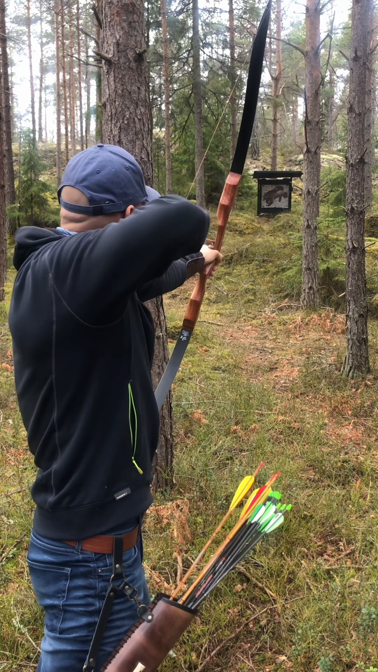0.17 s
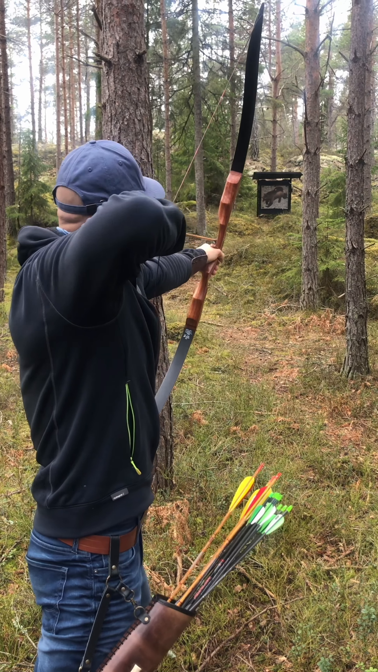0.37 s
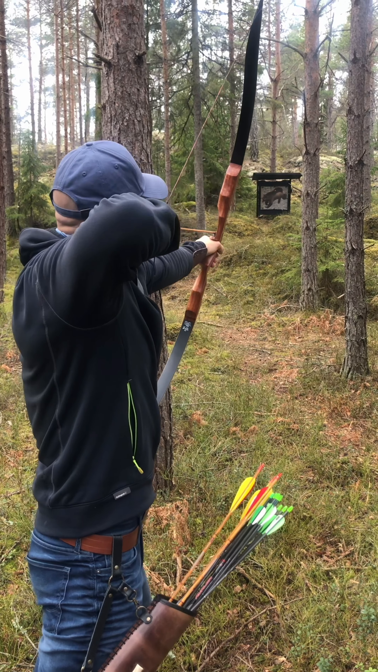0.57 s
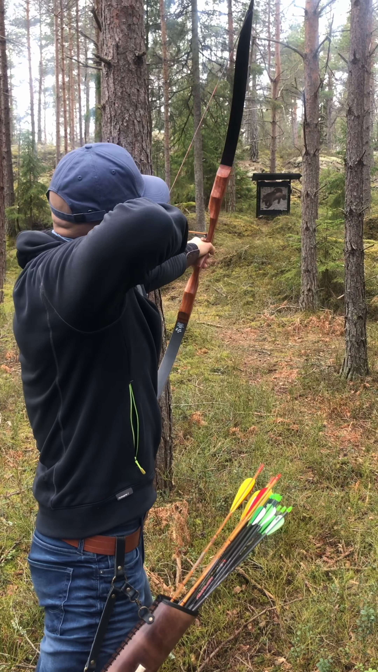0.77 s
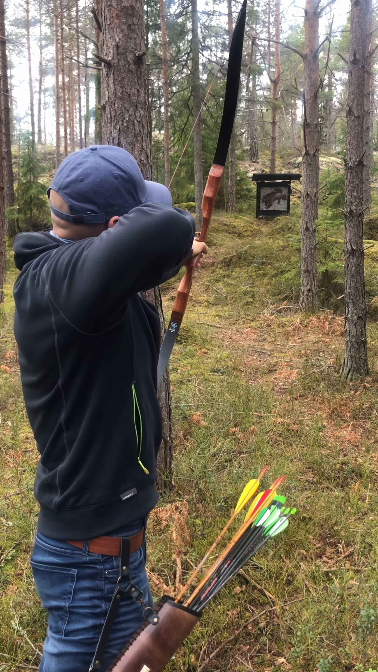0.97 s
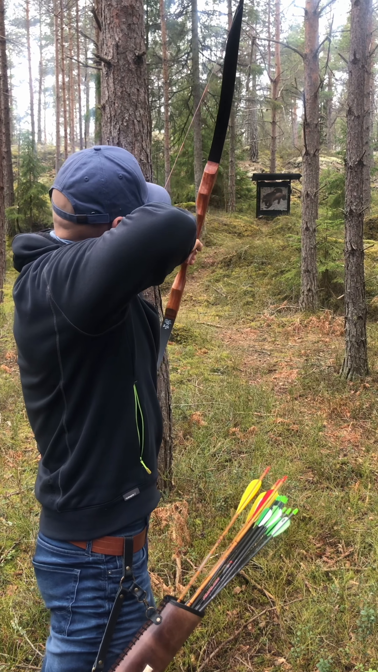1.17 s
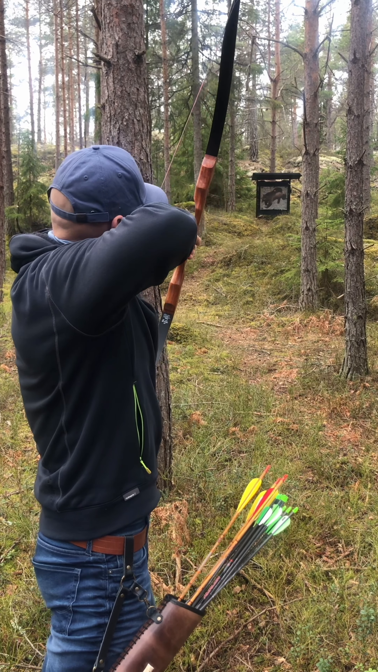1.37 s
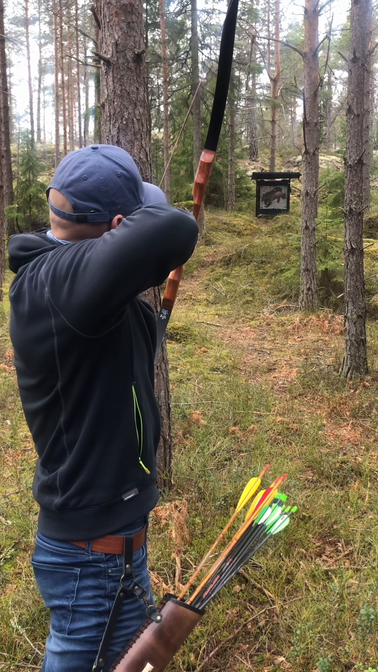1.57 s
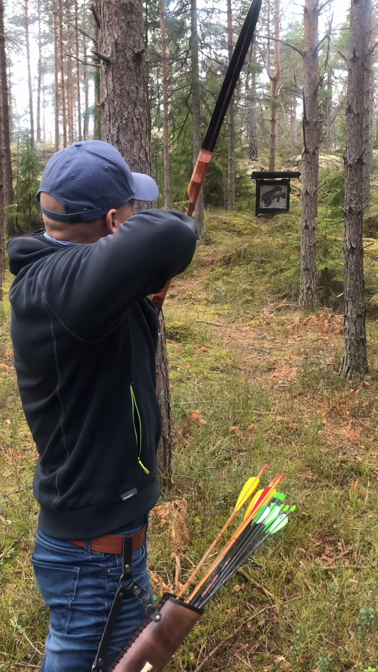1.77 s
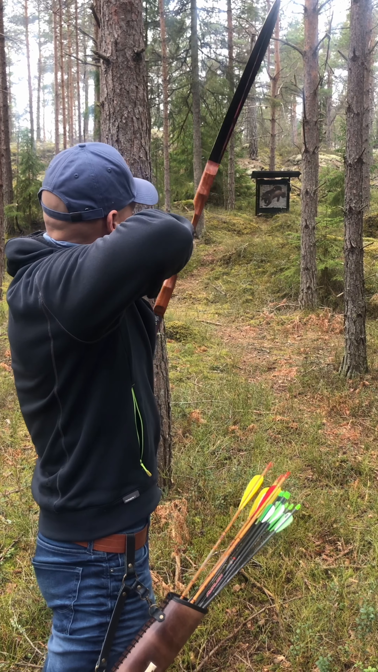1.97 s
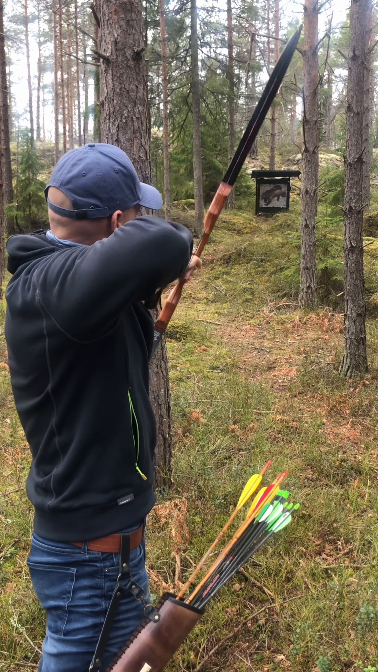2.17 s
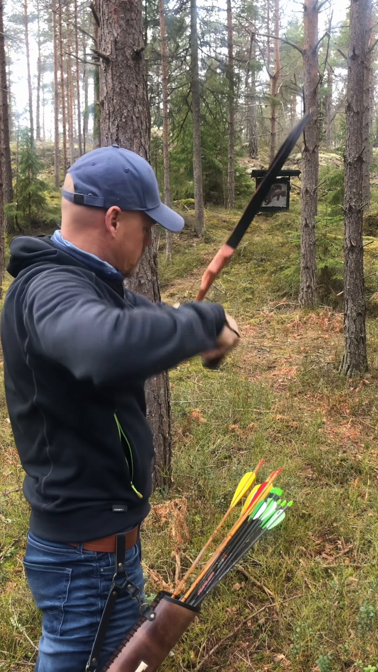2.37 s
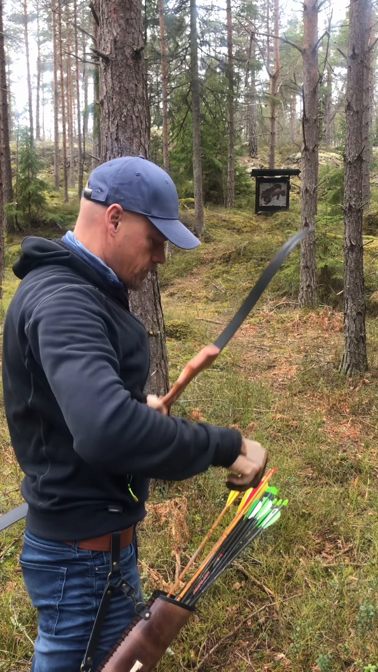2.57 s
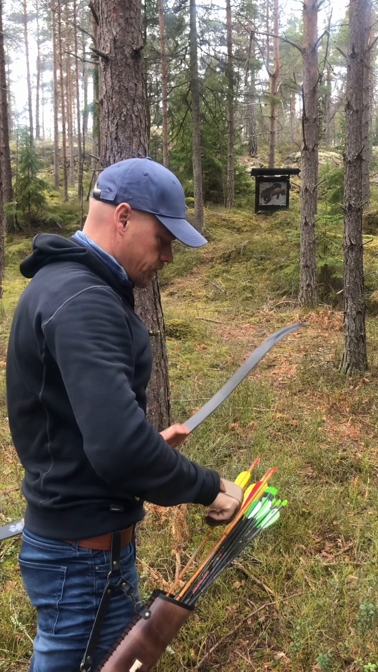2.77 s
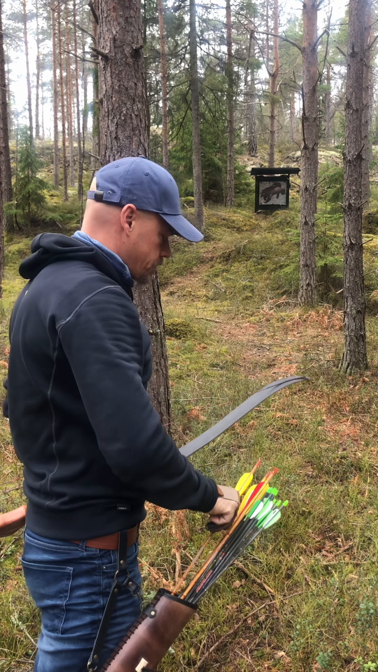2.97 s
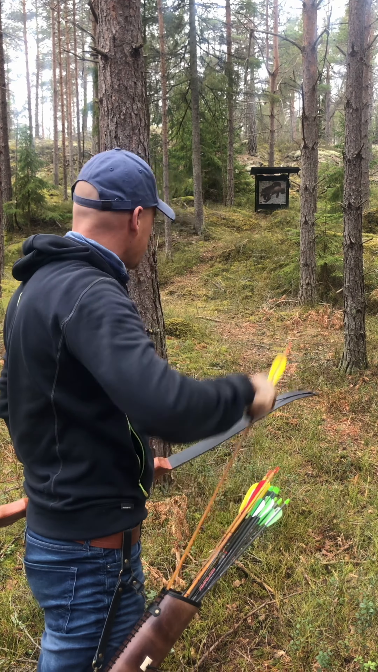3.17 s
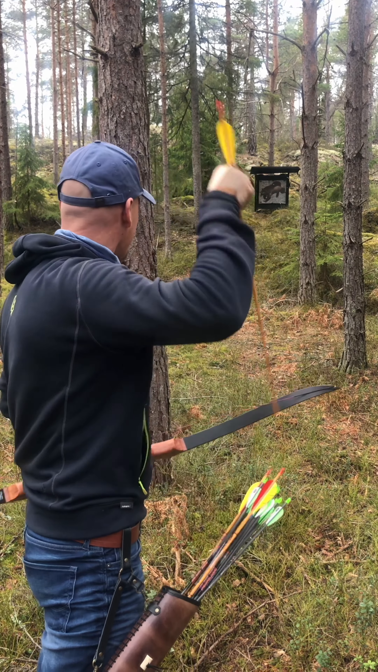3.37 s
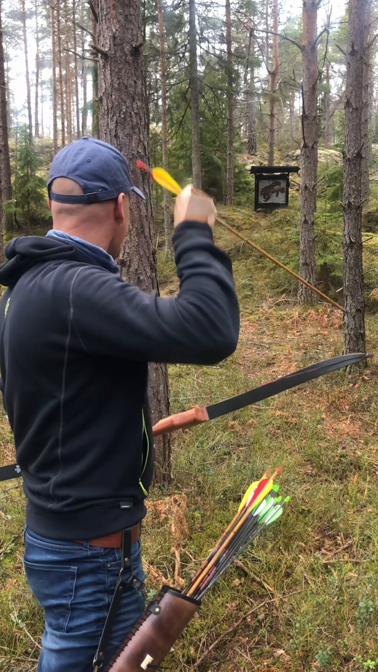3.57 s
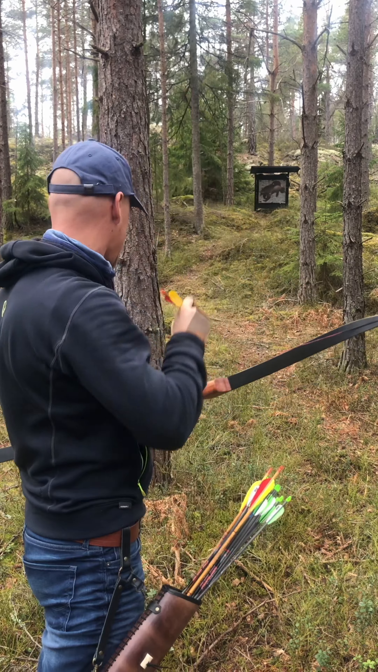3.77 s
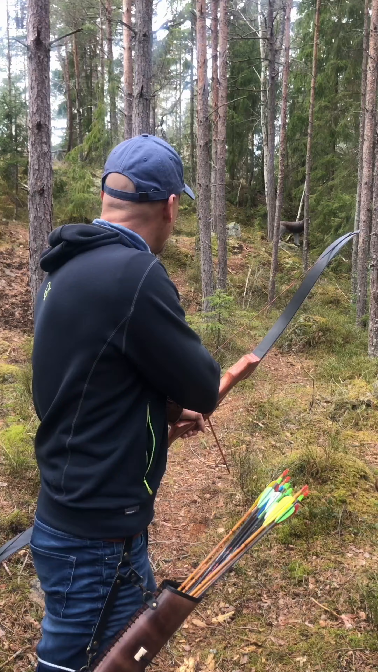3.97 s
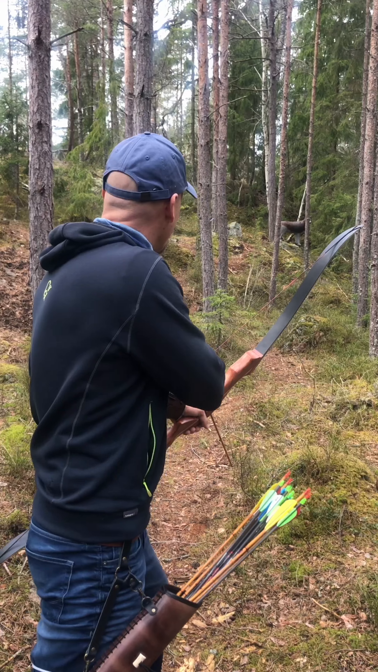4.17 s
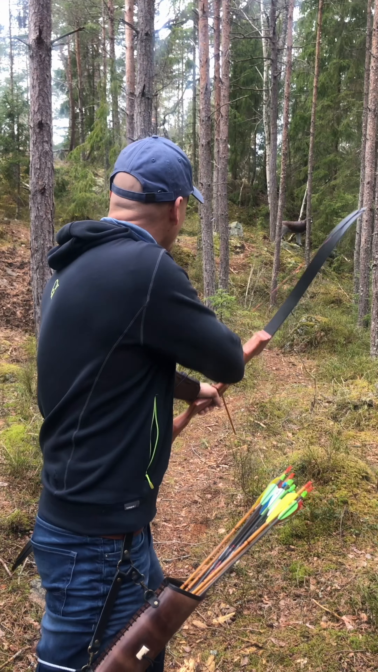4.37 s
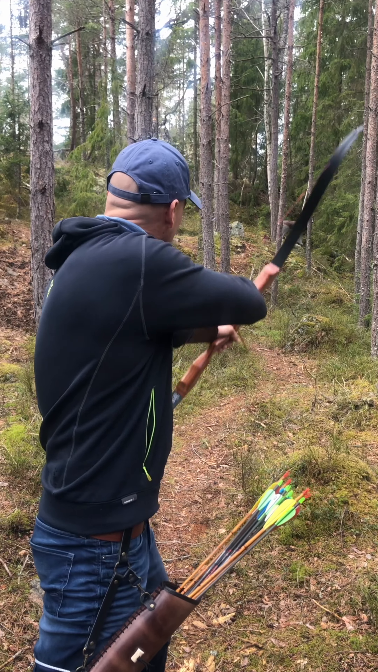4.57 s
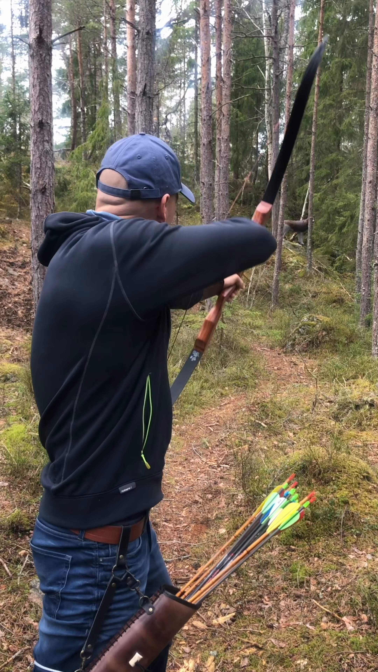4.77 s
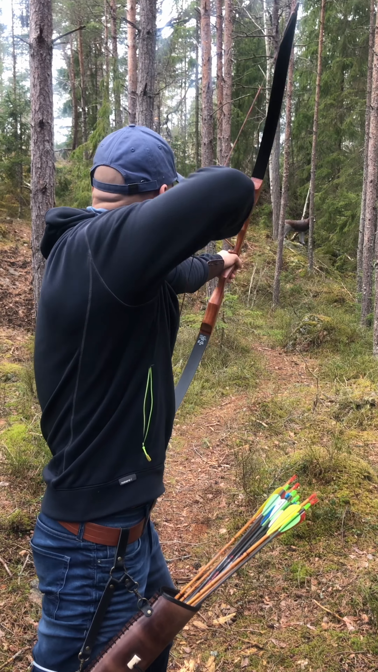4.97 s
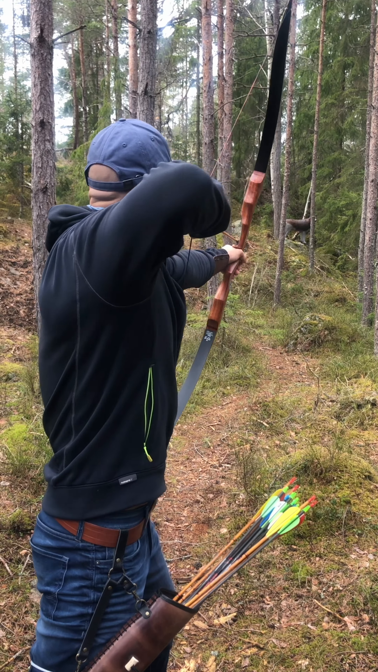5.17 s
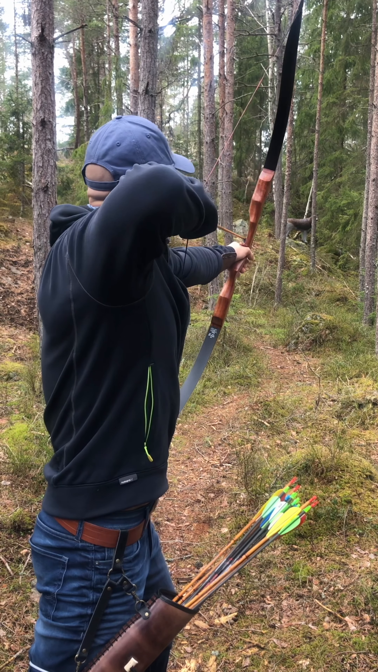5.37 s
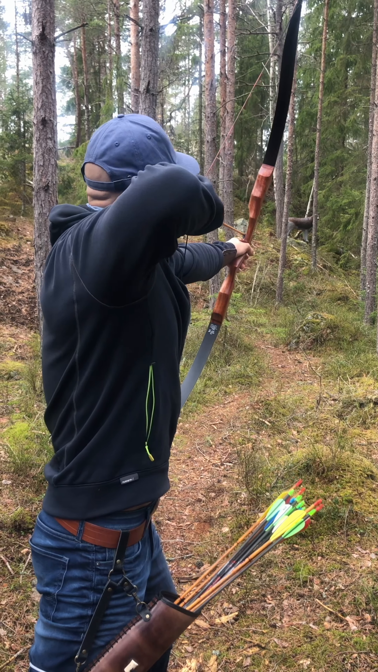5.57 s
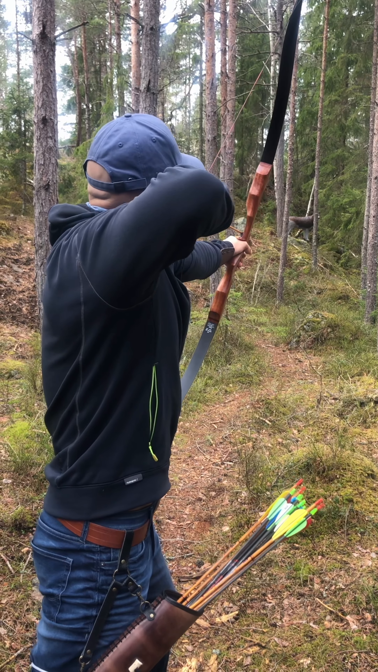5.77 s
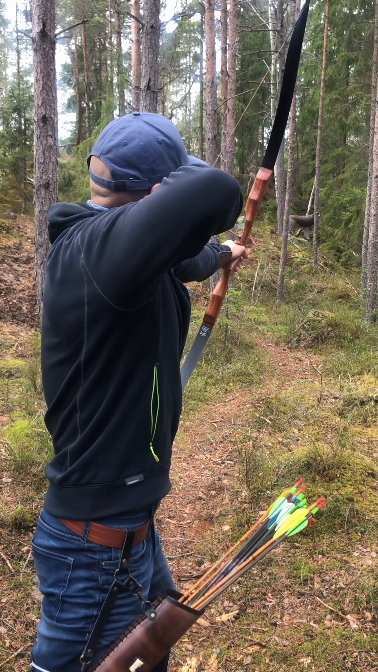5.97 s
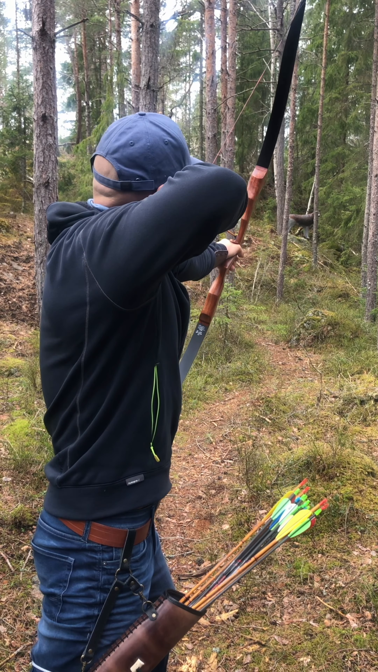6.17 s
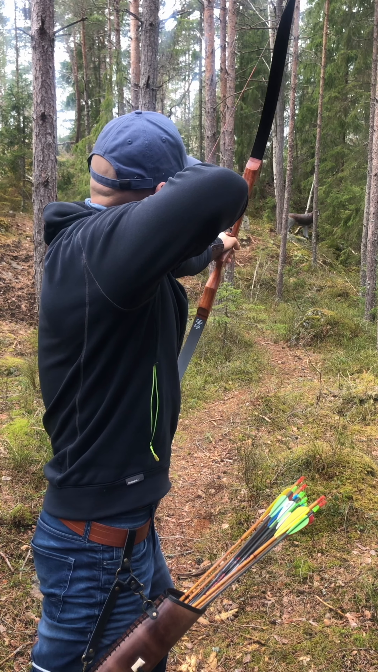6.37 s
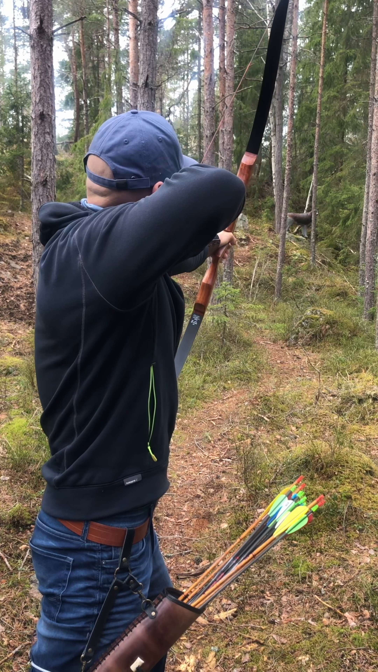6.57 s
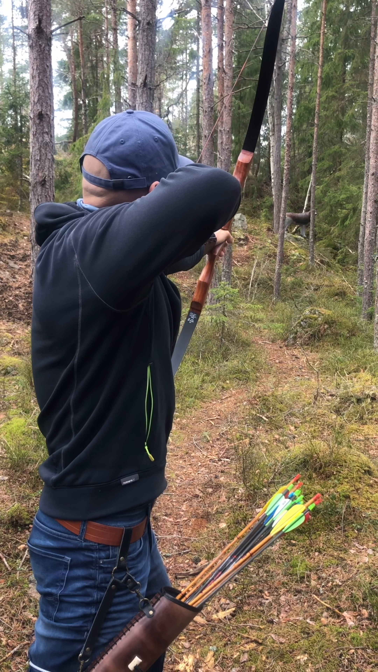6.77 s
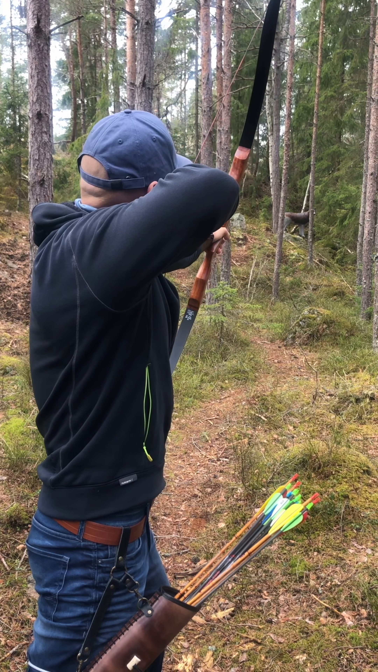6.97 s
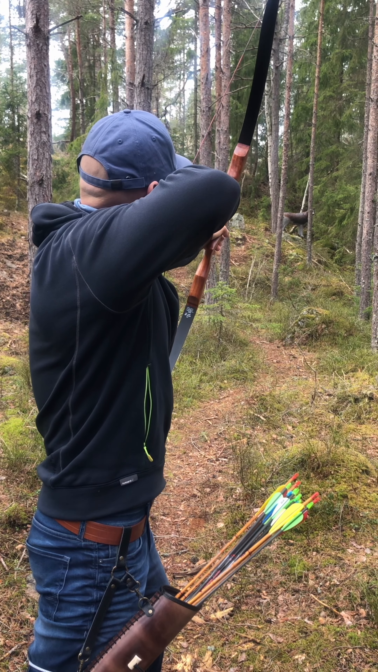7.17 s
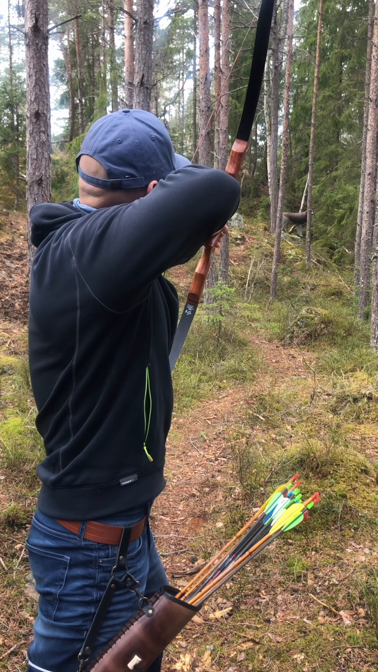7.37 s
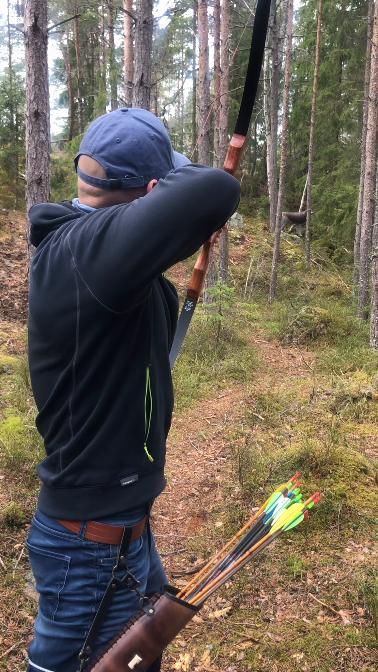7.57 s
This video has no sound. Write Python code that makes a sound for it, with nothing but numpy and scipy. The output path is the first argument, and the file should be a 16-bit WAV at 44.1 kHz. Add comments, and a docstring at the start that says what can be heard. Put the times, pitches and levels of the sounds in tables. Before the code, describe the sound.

Over a faint outdoor hum, a nearby bowstring lets go with a crisp snap and a rush of air, then rings low. The arrow smacks a target board less than half a second later, with a short woodland echo. Lighter handling follows: arrows rattling in a quiver, soft rubbing of feathers and sleeve, and a few dry ticks as an arrow goes onto the string. Two very faint bird chirps come near the end.

```python
"""A pine forest, where an archer looses an arrow. The string snaps off the fingers, slams home and thrums
in free vibration; the shaft chatters past the grip and thuds into a target, exciting its damped modes.
Shafts clack and rub as he draws a new arrow from the quiver, and he nocks it at another stand.
A bird chirps twice, far traffic hums, and the trunks scatter the sharp sounds back as echoes."""
import sys
import numpy as np
from scipy import signal
from scipy.fft import rfft, irfft, next_fast_len
from scipy.io import wavfile
from scipy.ndimage import map_coordinates

SR = 44100
rng = np.random.default_rng(int(sys.argv[2]) if len(sys.argv) > 2 else 0)


def file_out(sig):
    """Save sig as 16-bit WAV at sys.argv[1]."""
    # one column per channel
    cols = np.atleast_2d(sig).T
    # limit, then scale
    lim = np.clip(cols, -1, 1)
    pcm = np.round(lim * 32767).astype(np.int16)
    wavfile.write(sys.argv[1], SR, pcm)


N = 335601
RELEASE_S, SLAM_S, LAND_S, SECOND_STAND_S = 1.6828, 1.698, 2.0923, 4.0

# Modes of the shaft on the grip: pitch_hz, relative_db, t60_s
GRIP_MODES = [(610, -14, 0.027), (1540, -10, 0.036), (2030, -12.5, .03), (2444, -0.5, .03),
              (2714, -2, 0.047), (2840, -8, 0.022)]
# String snaps (release, slam, a last small one): start_s, ring_db, crack_db, centre_hz, rise_s, t60_s
STRING_SNAPS = [(1.6819, -26, -4, 12010, 0.0042, .012), (1.6972, -16, -14.5, 5453, 0.00063, 0.0085),
                (1.837, -55.5, -34, 5460, .0004, .006)]
# The shaft striking the grip as it passes: start_s, ring_db
SHAFT_CHATTER = [(1.7035, -26), (1.706, -19), (1.7106, -13.5), (1.716, -30.5), (1.7199, -23),
                 (1.7218, -23.5)]

def bow_contacts():
    """Impact excitation: each blow of string or shaft gives a broadband crack and rings the grip."""
    out = np.zeros(N)
    # the swinging string taps once a swing, ever weaker
    taps = [(1.733 + .011 * (swing + .3 * rng.normal()), -28 - 2.5 * swing) for swing in range(8)]
    light_blows = [(start, ring_db, -24 - 460 * (start - SLAM_S), 7004, .0005, .023)
                   for start, ring_db in SHAFT_CHATTER + taps]  # their cracks fade by 460 dB a second
    for start, ring_db, crack_db, hz, rise, t60 in STRING_SNAPS + light_blows:
        add(out, start, amp(ring_db) * ring(GRIP_MODES, 1.5, attack_s=.0008, detune=.015))
        add(out, start, amp(crack_db) * crack(hz, t60, 3.7, 13, attack_s=rise))
    add(out, RELEASE_S, ring([(6320, -17, .023)], .9, attack_s=.002))  # the nock leaves the string
    return out


# Modes of the string and of the bow's limbs: pitch_hz, level_db, t60_s
STRING_MODES = [(92, -42, 2.2), (95, -46, .45), (6100, -39, .1), (191, -39, 0.66), (275, -40.5, 0.76),
                (521, -39.5, 0.55), (589, -47, .6), (462, -48, .3), (1230, -45.5, 0.27), (2094, -55.5, .3),
                (2380, -55, .3), (2480, -49, 0.3), (2670, -50, .25), (2775, -40, .12)]
LIMB_MODES = [(135, -27.5, .09), (179, -21.5, .11), (240, -28.5, 0.11)]

def bow_thrum():
    """Free vibration: after the slam the string rings on, while the damped limbs only thud."""
    out = np.zeros(N)
    add(out, SLAM_S, ring(STRING_MODES, 1, attack_s=.02, waver_db=1.6))
    add(out, SLAM_S, ring(LIMB_MODES, 1, attack_s=.004, waver_db=1))
    return out


# Spectrum of the torn air: frequency_hz, relative_db
WHOOSH_SPECTRUM = [(180, -41.5), (300, -22.5), (470, -3), (1100, -14.5), (1580, -9), (1750, -13),
                   (2700, -15), (3640, -19.5), (16000, -36.5)]

def whoosh():
    """Turbulence: string and feathers tear the air into noise that decays exponentially."""
    out, t = np.zeros(N), np.arange(SR // 2) / SR
    rush = noise(len(t), lambda hz: along(WHOOSH_SPECTRUM, hz))
    add(out, RELEASE_S, amp(-27.5 - 60 * t / .3) * rush)
    return out


# Modes of the target board: pitch_hz, relative_db, t60_s
BOARD_MODES = [(207.3, -17.5, 0.073), (420, -12.5, 0.035), (773, 2, 0.018), (1260, 6, .014),
               (1910, 11, 0.0063)]

def target_hit():
    """Impulse response: the tip's brief contact cracks brightly, then the damped board sounds dull."""
    out = np.zeros(N)
    add(out, LAND_S, amp(-14.5) * click(7300, 2.5, 11))
    add(out, LAND_S + .00066, amp(-19.5) * click(4000, 2.5, 3))  # the tip rebounds and strikes again
    add(out, LAND_S, amp(-28) * crack(8400, .0085, 1.9, 10, attack_s=.00015))
    add(out, LAND_S + .0006, amp(-25) * ring(BOARD_MODES, 1, attack_s=.00086))
    add(out, LAND_S + .001, amp(-32) * crack(1060, .085, 5.4, 9.6))  # the thud
    return out


# Modes of an arrow shaft: pitch_hz, relative_db, t60_s
SHAFT_MODES = [(652, 0.5, 0.27), (963, 3, 0.346), (1350, -2.5, 0.06), (2186, -8, 0.12), (2724, -6, 0.054),
               (3160, -1.5, 0.07), (4170, 5, 0.03), (4420, 1, 0.07), (5220, -6, 0.052), (6160, -2, 0.043),
               (6620, 1, 0.039), (7203, 3, 0.029), (9006, -22, .016)]
# Shafts knocking together: start_s, crack_db, centre_hz, ring_over_crack_db
SHAFT_CLACKS = [(3.029, -39, 4430, -8), (3.2015, -32.5, 5900, -19), (3.2058, -27, 5690, -16),
                (3.211, -32.5, 5460, -8), (3.2843, -26.5, 6430, -8.5), (3.288, -29, 6454, -13),
                (3.3282, -33.5, 5600, -18), (3.336, -47, 1900, 2.5), (3.3467, -36, 4540, -10.5),
                (3.365, -55, 6000, -20), (3.4012, -60, 5000, -3)]

def shaft_clacks():
    """Selective excitation: a knock drives most strongly the modes near its own centre frequency."""
    out = np.zeros(N)
    for start, db, centre_hz, ring_db in SHAFT_CLACKS:
        add(out, start, amp(db) * crack(centre_hz, .029, 6.1, 14.6, attack_s=.00082))
        driven = [(hz, level - 5 * np.log2(hz / centre_hz) ** 2, t60) for hz, level, t60 in SHAFT_MODES]
        add(out, start, amp(db + ring_db) * ring(driven, 3, attack_s=.0004, detune=.006, waver_db=2.5))
    return out


# Thuds of the target stand and the quiver: start_s, level_db, centre_hz, t60_s
SOFT_THUMPS = [(2.105, -43.5, 95, .12), (3.121, -39, 480, 0.053), (3.206, -33.5, 322, 0.041),
               (3.22, -49.5, 100, .1)]

def thumps():
    """Soft impact: a slow contact puts its energy into low frequencies."""
    out = np.zeros(N)
    for start, db, hz, t60 in SOFT_THUMPS:
        add(out, start, amp(db) * crack(hz, t60, 17, 10.4, attack_s=.0039))
    return out


# Dry ticks of nocks and feathers: start_s, level_db, centre_hz
NOCK_TICKS = [(0.7086, -65, 5000), (1.6476, -62, 6500), (2.016, -51, 4380), (2.024, -54, 4950),
              (2.9824, -61, 3520), (3.456, -65, 10900), (3.468, -66, 12000), (3.615, -62, 13000),
              (3.63, -64, 12000), (3.707, -59, 9000), (3.715, -50, 7780), (4.134, -58, 4490),
              (4.273, -62, 5000), (4.3934, -64, 4000), (4.4345, -48.5, 4300), (4.452, -48, 4470),
              (4.464, -50, 3500), (4.4778, -45, 3500), (5.205, -64.5, 6040), (5.9145, -62, 5000),
              (5.9747, -57.5, 4200)]

def ticks():
    """Light impact: brief contacts give short treble bursts; fainter ones fall at random moments."""
    out = np.zeros(N)
    faint = [(N / SR * when, -71 + 4 * size, 6000 * 2 ** octaves)
             for when, size, octaves in rng.random((8, 3))]
    for start, db, hz in NOCK_TICKS + faint:
        add(out, start, amp(db) * crack(hz, .015, 7, 15))
    return out


# Strokes of feathers, shafts and sleeve: start_s, length_s, level_db
RUB_STROKES = [(3.038, 0.066, -63), (3.095, 0.06, -61), (3.172, 0.042, -59.5), (3.212, 0.061, -50.5),
               (3.293, .025, -62), (3.328, 0.054, -51), (3.374, 0.089, -65), (4.08, 0.17, -74.5),
               (4.188, 0.057, -64), (4.234, 0.035, -56.5), (4.391, 0.043, -74), (4.439, 0.064, -63.5),
               (4.495, 0.025, -64.5), (4.53, 0.03, -70)]

def rubbing():
    """Sliding friction: noise in uneven grains swells and fades with each stroke."""
    out = np.zeros(N)
    swell_share = .33
    for start, length, db in RUB_STROKES:
        progress = np.linspace(0, 1, int(length * SR))
        stroke = np.minimum(progress / swell_share, (1 - progress) / (1 - swell_share)) ** .49
        add(out, start, amp(db) * stroke * noise(len(stroke), hump(4900, 6.3, 13)))
    grains = amp(3 * wobble(330))
    return out * grains


# Arm movements: start_s, rise_s, hold_s, fall_s, level_db
ARM_MOVES = [(-0.1, 0.081, .05, .6, -78), (3.5, 0.88, 0.78, .4, -78)]
# Spectrum of sliding cloth: frequency_hz, relative_db
CLOTH_SPECTRUM = [(1500, -31), (3500, 0), (6000, -3.5), (10000, -9), (16000, -10)]

def cloth_hiss():
    """Friction noise: cloth hisses smoothly while the arms move."""
    envelope, t = np.zeros(N), np.arange(N) / SR
    for start, rise, hold, fall, db in ARM_MOVES:
        corners_s = np.cumsum([start, rise, hold, fall])
        envelope += amp(np.interp(t, corners_s, [db - 13, db, db, db - 13], left=-120, right=-120))
    return envelope * amp(1.5 * wobble(17)) * noise(N, lambda hz: along(CLOTH_SPECTRUM, hz))


# Bird calls: start_s, level_db
BIRD_CHIRPS = [(5.056, -66), (6.303, -67.5)]

def bird():
    """Frequency modulation: a pure whistle glides upward and holds its top note."""
    out = np.zeros(N)
    low_hz, high_hz, length_s, rise_share = 3640, 4386, .043, .87
    progress = np.arange(int(length_s * SR)) / (length_s * SR)
    pitch_hz = low_hz + (high_hz - low_hz) * np.minimum(progress / rise_share, 1) ** 2.07
    envelope = np.sin(np.pi * progress) ** .24
    whistle = np.sin(2 * np.pi * np.cumsum(pitch_hz) / SR)
    for start, db in BIRD_CHIRPS:
        add(out, start, amp(db + 1.5 * progress) * envelope * whistle)
    return out


# Echo tail among the trunks: frequency_hz, unstretched_t60_s, relative_db
TRUNK_DECAY = [(200, 0.6, 0.5), (990, 0.81, 0.5), (4020, 0.78, -8), (12000, 0.35, -9)]

def trunk_echoes(sound, stretch):
    """Scattering: many reflections merge into a noise tail, each frequency dying at its own rate."""
    hz, t, spectrum = signal.stft(rng.standard_normal(SR), SR, nperseg=256)
    t60 = stretch * along(TRUNK_DECAY, hz)[:, None]
    fade_db = along(TRUNK_DECAY, hz, column=2)[:, None] - 60 * t / t60
    tail = signal.istft(spectrum * amp(fade_db), SR, nperseg=256)[1]
    delayed = np.pad(sound, (300, 0))
    return signal.fftconvolve(delayed, tail / np.linalg.norm(tail))[:N]


# Spectrum of the forest hum at each stand: frequency_hz, relative_db
FIRST_HUM = [(19, -45.5), (32, -13), (60, -3.5), (108, -10), (248, -2), (426, -10), (485, -7.5),
             (735, -9.5), (858, -10), (1080, -12), (2120, -23), (2550, -23), (4990, -35.5), (15600, -45.5)]
SECOND_HUM = [(19, -38), (32, -15.5), (54, -4), (168, -6), (248, -2), (305, -6.5), (511, -8), (597, -7.5),
              (774, -9.5), (904, -10), (1140, -12.5), (3560, -31.5), (5260, -34.5), (15600, -43.5)]
# Strength of that hum: first_stand_db, second_stand_db
HUM_DB = [-60.5, -62]
# Swell of the far road: time_s, level_db
ROAD_SWELL = [(0, -79.5), (1.5, -68), (2.6, -65), (3.5, -63.5), (4, -65.5)]

def forest_hum():
    """Ambient noise: each stand has its own spectrum, and the far road swells only at the first."""
    t = np.arange(N) / SR
    road = amp(np.interp(t, *np.transpose(ROAD_SWELL))) * noise(N, hump(1000, 9, 10.73))
    first = amp(HUM_DB[0]) * noise(N, lambda hz: along(FIRST_HUM, hz)) + road
    second = amp(HUM_DB[1]) * noise(N, lambda hz: along(SECOND_HUM, hz))
    drift = amp(.3 * wobble(1.2) + .5 * wobble(6))
    return np.where(t < SECOND_STAND_S, first, second) * drift


def ring(modes, scatter_db, attack_s, detune=0.0, waver_db=0.0):
    """Modal superposition: damped sines, varied at each blow, that may waver as they die."""
    t = np.arange(int(3 * SR * max(t60 for _, _, t60 in modes))) / SR
    tones = 0
    for hz, db, t60 in modes:
        knots = t * np.sqrt(hz)  # higher modes waver faster
        waver = waver_db * map_coordinates(rng.standard_normal(int(knots[-1]) + 4), [knots])
        level_db = db + rng.normal(0, scatter_db) + waver - 60 * t / t60
        pitch_hz = hz * (1 + detune * rng.normal())
        tones += amp(level_db) * np.sin(2 * np.pi * pitch_hz * t + .19 * waver)
    return tones * (1 - np.exp(-t / attack_s))


def crack(hz, t60, below_db, above_db, attack_s=.0004):
    """Exponential decay of a noise burst centred on hz."""
    t = np.arange(SR // 8) / SR
    envelope = amp(-60 * t / t60) * (1 - np.exp(-t / attack_s))
    return envelope * noise(len(t), hump(hz, below_db, above_db))


def click(hz, below_db, above_db):
    """A filtered impulse of peak 1."""
    spectrum = amp(hump(hz, below_db, above_db)(np.fft.rfftfreq(256, 1 / SR)))
    pulse = np.roll(irfft(spectrum), 16)[:64]
    return pulse / pulse.max()


def hump(centre_hz, below_db, above_db):
    """A band-pass spectrum, falling by so many dB per octave on each side."""
    def colour_db(hz):
        octaves = np.log2((hz + 20) / centre_hz)
        return np.where(octaves < 0, below_db, -above_db) * octaves
    return colour_db


def noise(count, colour_db):
    """Spectral shaping: noise of rms 1 whose spectrum follows colour_db(hz)."""
    size = next_fast_len(count + 512)
    gain = amp(colour_db(np.fft.rfftfreq(size, 1 / SR)))
    shaped = irfft(rfft(rng.standard_normal(size)) * gain, size)[:count]
    return shaped / np.sqrt(np.mean(shaped ** 2))


def wobble(rate):
    """A smooth random curve with rate knots a second."""
    return map_coordinates(rng.standard_normal(int(N * rate / SR) + 4), [np.arange(N) * rate / SR])


def along(points, hz, column=1):
    """Interpolation of a table column over log frequency."""
    table = np.transpose(points)
    return np.interp(np.log(hz + 1), np.log(table[0] + 1), table[column])


def amp(db):
    """Amplitude ratio of a level in dB."""
    return 10 ** (np.asarray(db) / 20)


def add(track, start_s, sound):
    """Superposition of a sound on the track from start_s on."""
    part = track[round(start_s * SR):][:len(sound)]
    part += sound[:len(part)]


def scene():
    """Direct-to-reverberant ratio: far sources carry more echo than near ones."""
    shot = bow_contacts() + bow_thrum() + whoosh()
    hit = target_hit()
    handling = shaft_clacks() + thumps() + ticks()
    chirps = bird()
    echoes = (amp(-23.5) * trunk_echoes(shot, 1.1) + amp(-14.5) * trunk_echoes(hit, .81)
              + amp(-16) * trunk_echoes(handling, .25) + amp(6) * trunk_echoes(chirps, 1))
    return (shot + hit + handling + chirps + echoes + rubbing() + cloth_hiss() + forest_hum())[None]


def record(dry):
    """Band limiting: a low-pass with a raised-cosine edge removes the highest treble."""
    top_hz, edge_hz = 16000, 300
    size = next_fast_len(N + 4096)
    edge = np.clip((top_hz - np.fft.rfftfreq(size, 1 / SR)) / edge_hz + .5, 0, 1)
    return irfft(rfft(dry, size) * np.sin(np.pi / 2 * edge) ** 2, size)[:, :N]


dry = scene()
out = record(dry)
file_out(out)
```